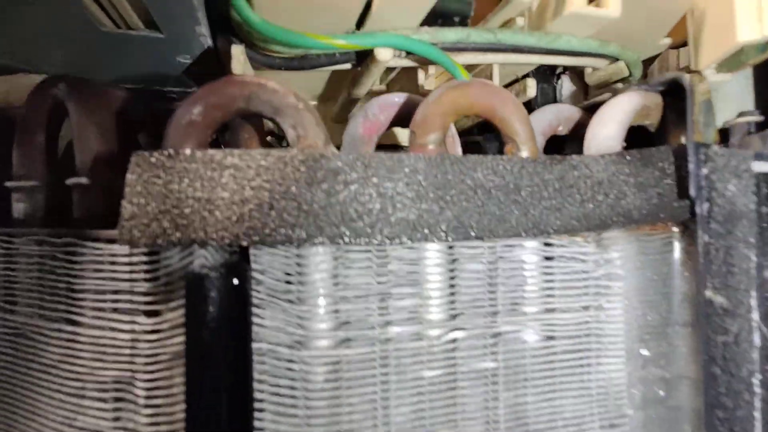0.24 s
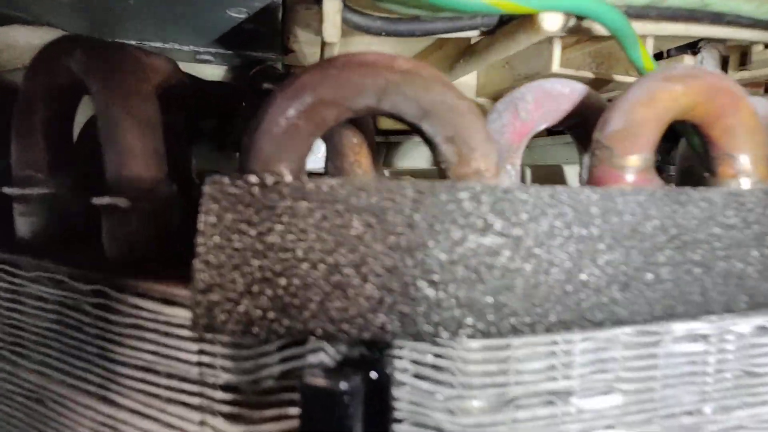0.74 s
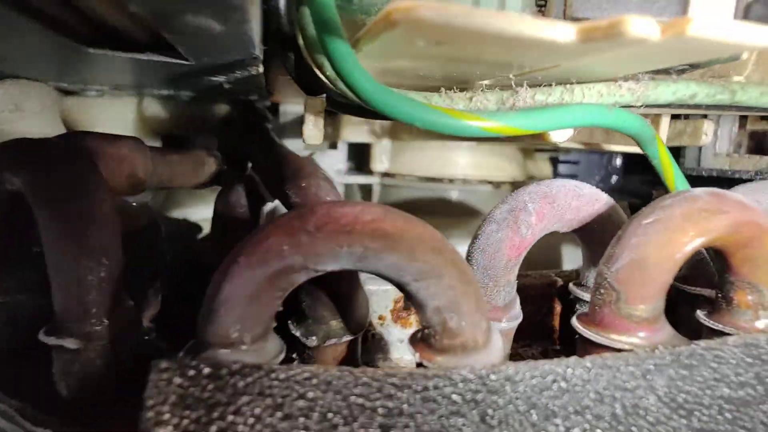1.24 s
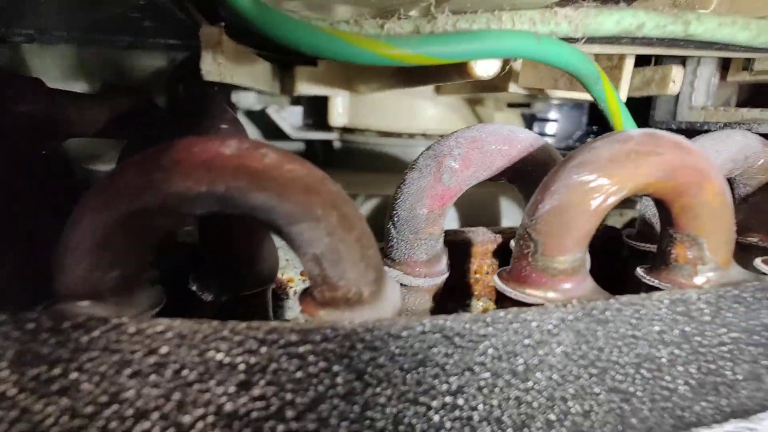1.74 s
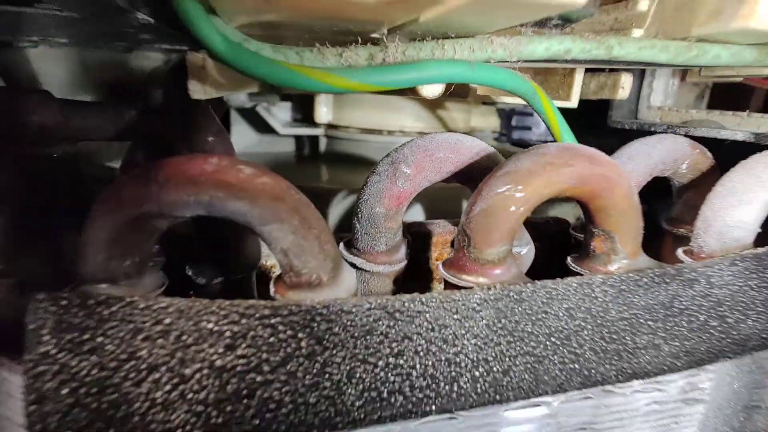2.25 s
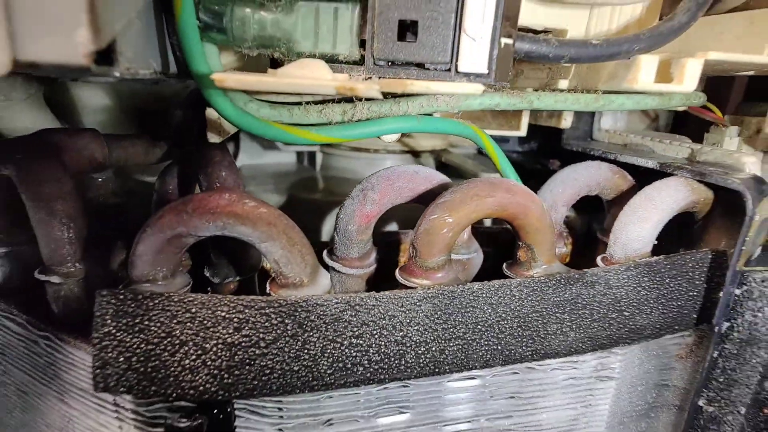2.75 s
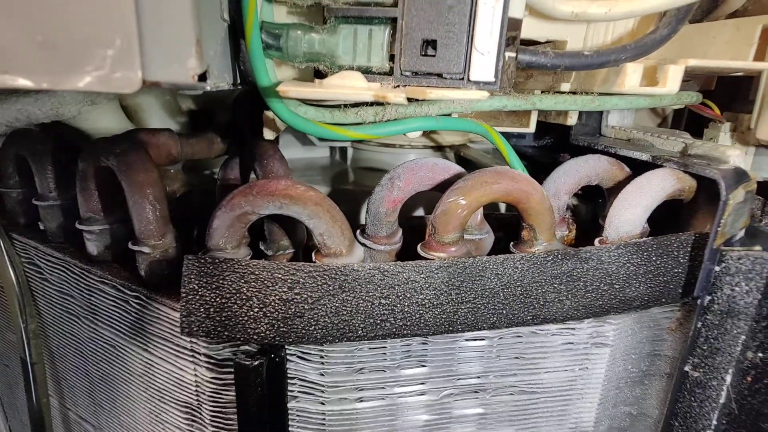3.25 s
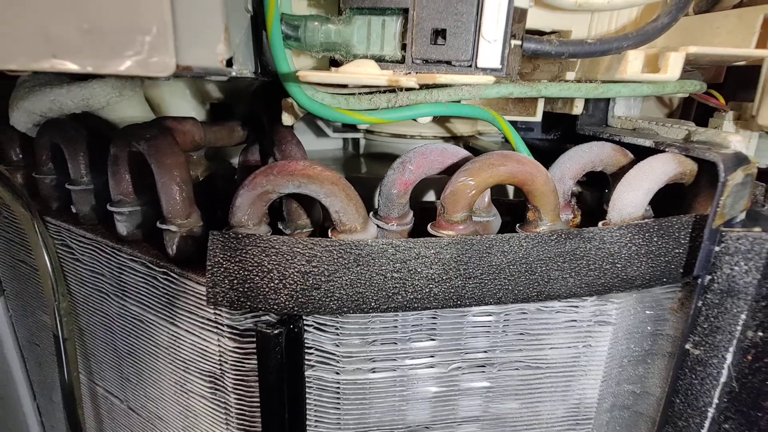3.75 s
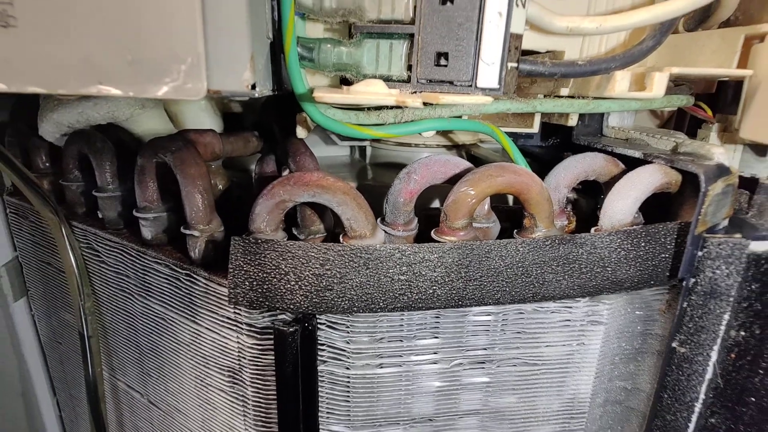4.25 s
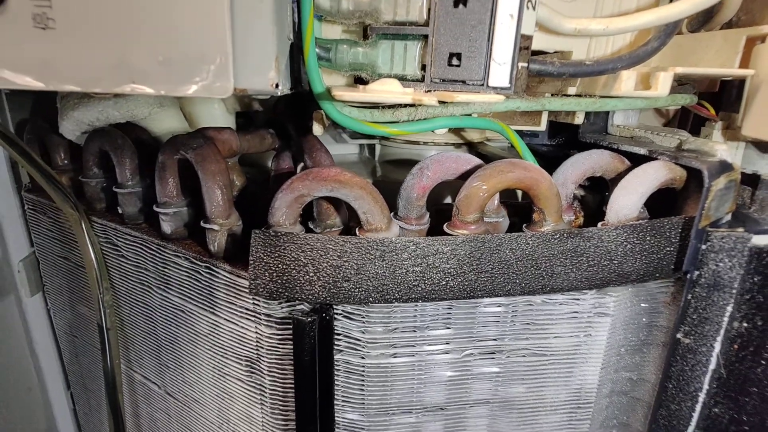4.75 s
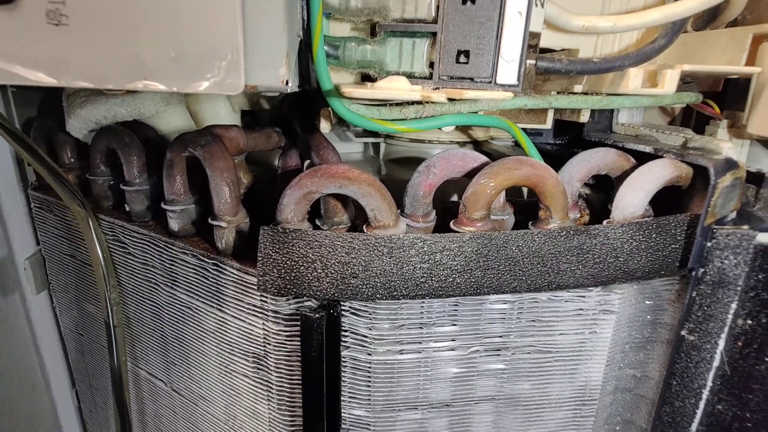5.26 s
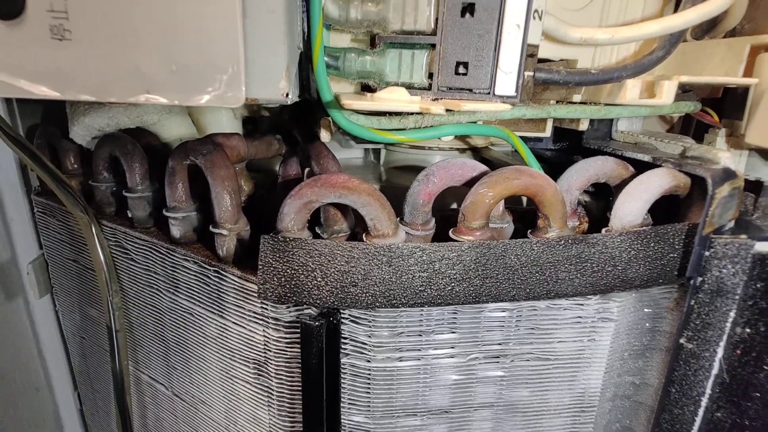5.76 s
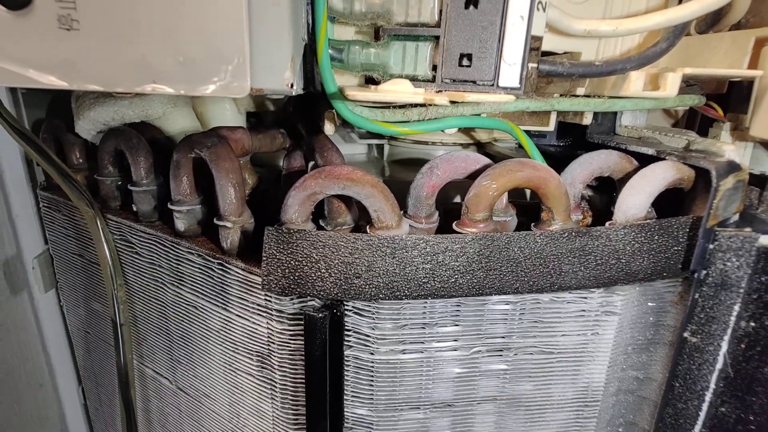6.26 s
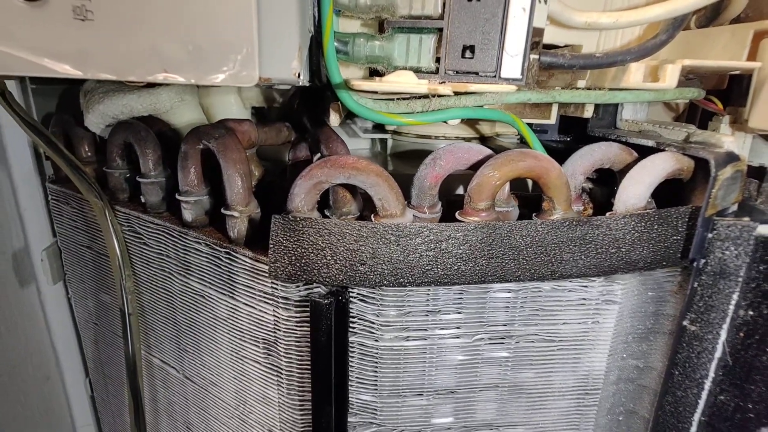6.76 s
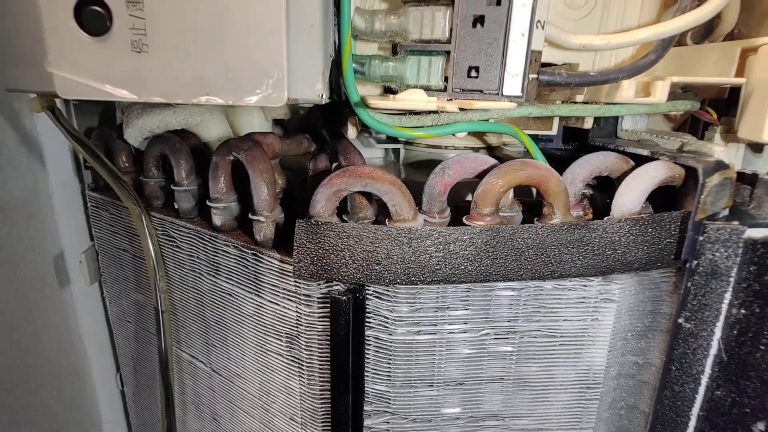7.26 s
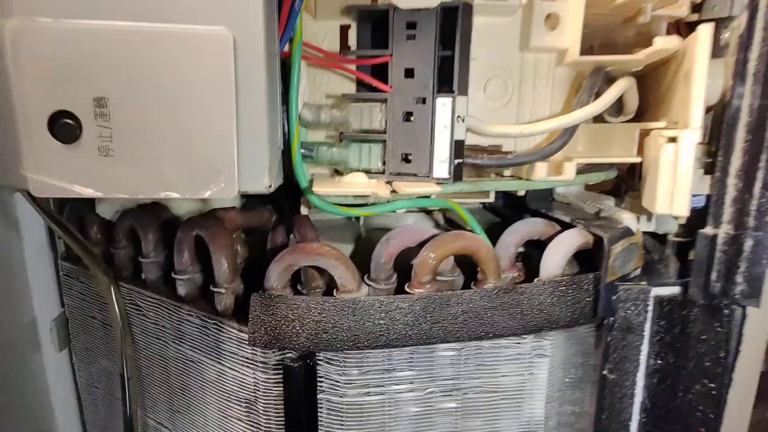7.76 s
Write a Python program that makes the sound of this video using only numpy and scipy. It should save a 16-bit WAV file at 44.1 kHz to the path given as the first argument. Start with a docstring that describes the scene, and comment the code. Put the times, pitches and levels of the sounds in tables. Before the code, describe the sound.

Close up, a cooling unit hums quietly while its coil snaps and ticks unevenly, with tiny liquid blips and one brief fizz midway.

```python
"""An opened indoor air conditioner hums in a quiet room, close to the microphone: steady sines and soft noise.
From the start its frosting coil contracts in sharp, irregular ticks: noise bursts that rattle through the fins,
ring in the casing and wake the room. The hand-held microphone rumbles early on, then leans in and the air swells.
Later come rising sine blips of refrigerant and, midway, one short two-band noise fizz with a fainter rumble.
One more strong tick and another faint rumble come near the end."""
import sys
import numpy as np
from scipy import signal
from scipy.fft import rfft, irfft
from scipy.io import wavfile
from scipy.ndimage import uniform_filter1d

SR = 44100
rng = np.random.default_rng(int(sys.argv[2]) if len(sys.argv) > 2 else 0)


def pcm_store(signal):
    """Save signal as 16-bit PCM."""
    levels = np.round(np.clip(np.atleast_2d(signal), -1, 1) * 32767)
    wavfile.write(sys.argv[1], SR, levels.astype(np.int16).T)


N = 354034
T = np.arange(N) / SR  # time in seconds

# slips of the coil: start_s, level_db (at 3-9 kHz, before room and standing waves),
# ring_db (extra casing ring around 2 kHz), bright_db (extra treble, in full from 12 kHz)
COIL_SLIPS = [(0.095, -40.5, 0.5, -3.5), (0.4022, -29, -1.2, -2), (0.6641, -22.8, -8.5, -2.5),
              (1.003, -27, -1.2, -2), (1.314, -41, -2.5, 0), (1.4209, -39.5, -8.5, 1.5),
              (2.9111, -25.5, -6, 2), (3.3325, -60, 4.5, -16), (3.6511, -23, -12.5, 2.5),
              (3.7718, -40.5, -3, 0), (4.3564, -40.3, -9.5, -8), (4.6236, -59.7, -8, -1),
              (4.652, -59.5, -6, -4), (4.7722, -53.5, -2.5, 0), (4.9172, -50, -12, 2),
              (4.938, -49, -11, -2), (5.6728, -45.5, -8, 3), (5.7418, -42.5, -14, 2.5),
              (5.875, -59.5, -18, 3), (6.0465, -53.6, -1.5, 2), (6.0606, -51, -3.5, 2),
              (6.7828, -43.5, -6.5, -4), (7.4451, -27.5, -0.5, -1), (7.7524, -55.8, -7, -1.6)]


def ticks(mix):
    """Adds every slip; each happens elsewhere on the coil and meets its own peaks and dips."""
    for start_s, level_db, ring_db, bright_db in COIL_SLIPS:
        place = standing_waves(depth_db=2.0, spacing_hz=189.7, full_hz=1500)
        add(mix, start_s, in_unit(tick(level_db, ring_db, bright_db), place))


TICK_PAN_DB = 1.5  # left minus right: the coil sits a little to the left
# stronger and brighter slips are quicker, so they carry less low knock (dB, and dB lost per dB)
USUAL_TICK_DB, USUAL_KNOCK_DB = -41.5, 0.6
KNOCK_LOSS_BY_LEVEL, KNOCK_LOSS_BY_BRIGHTNESS = 0.16, 0.54


def tick(level_db, ring_db, bright_db, rise_s=0.0032, sharpness=1.96,
         rattle_db=-10.0, rattle_t60_s=0.074, wet_db=1.1, size=16384):
    """One slip of the coil: a swarm of reflections between the fins, a short rattle, then the room."""
    t = np.arange(size) / SR
    hz = abs(np.fft.fftfreq(size, 1 / SR))
    swarm = (t / rise_s * np.exp(1 - t / rise_s)) ** sharpness
    rattle = amp(rattle_db - 60 * (t - rise_s) / rattle_t60_s) * np.minimum(t / rise_s, 1) ** 2
    shape = np.hypot(swarm, rattle)
    shape /= np.sqrt(np.mean(shape[t < 0.015] ** 2))  # rms 1 over the first 15 ms
    crack = np.fft.fft(rng.standard_normal((2, size)) * shape)
    # the fins scatter the slip in time but pass every band alike
    band_level = np.sqrt(uniform_filter1d(abs(crack) ** 2, size=300, mode="wrap"))
    crack *= causal(np.linalg.norm(shape) / band_level)
    heard = crack + amp(wet_db) * np.fft.fft(room_tail(t))
    level_loss_db = KNOCK_LOSS_BY_LEVEL * (level_db - USUAL_TICK_DB)
    knock_db = USUAL_KNOCK_DB - level_loss_db - KNOCK_LOSS_BY_BRIGHTNESS * bright_db
    colour = causal(tick_colour(hz, knock_db, ring_db, bright_db))
    return amp(level_db) * panned(TICK_PAN_DB) * np.fft.ifft(heard * colour).real


# broad colour that coil and casing give a tick: pitch_hz, relative level_db
COIL_COLOUR = [(420.0, -30), (760.0, -18.5), (1300.0, -21), (1750.0, -13.5), (2200.0, 4.5), (2750.0, -12),
               (3800.0, -14.5), (4650.0, -7.5), (5300.0, -13.5), (6400.0, -8.5), (7800.0, -10.5),
               (10000.0, -17.5), (12000.0, -14.5), (15000.0, -16)]
# narrow resonances of tubes and casing, shared by every tick: pitch_hz, width_hz, peak_db
CASING_MODES = [(758, 57, 5), (1515, 69, 2), (1820, 120, 5), (2090, 300, 4.5), (2715, 85, 5),
                (3060, 250, 3.5), (3603, 80, 7.5), (4500, 72, 2), (4670, 110, 3), (5640, 90, 2),
                (5850, 110, 3), (6700, 100, 3.5), (7550, 240, 3.5), (8660, 130, 4), (11600, 280, 5.5),
                (13430, 290, 7.5)]


def tick_colour(hz, knock_db, ring_db, bright_db):
    """Gain of coil and casing, rms 1 at 3-9 kHz; the place of the slip sets its knock, ring and brightness."""
    modes_db = sum(peak_db / (1 + (2 * (hz - mode_hz) / width_hz) ** 2)
                   for mode_hz, width_hz, peak_db in CASING_MODES)
    own_points = [(1400, knock_db), (1900, ring_db), (2400, ring_db), (2800, 0), (7500, 0), (12000, bright_db)]
    colour = amp(read(COIL_COLOUR, hz) + modes_db + read(own_points, hz))
    return colour / np.sqrt(np.mean(colour ** 2 * (hz > 3000) * (hz < 9000)))


# the room's answer to a tick, before build-up and mix: pitch_hz, start_db (relative), t60_s
ROOM_ECHO = [(710, 3.5, 0.13), (2200, -5.5, 0.17), (2980, -3, 0.18), (5000, -6.5, 0.18), (8000, -10, 0.19),
             (14000, -8.5, 0.17)]


def room_tail(t, build_up_s=0.015, steepness=0.98):
    """Diffuse echoes that swell as the walls answer, then die away at a rate set for each band."""
    hz, at_s, grid = signal.stft(rng.standard_normal((2, len(t))), SR, nperseg=256)
    room = np.array(ROOM_ECHO)
    start_db = read(room[:, [0, 1]], hz)[:, None]
    t60_s = read(room[:, [0, 2]], hz)[:, None]
    decay = np.exp(-np.log(1000) * at_s / t60_s)
    tail = signal.istft(grid * amp(start_db) * decay, SR, nperseg=256)[1]
    return tail[:, :len(t)] * np.minimum(t / build_up_s, 1) ** steepness


# bubbles in the tubes: start_s, peak_db (before standing waves), pitch_hz (at onset)
BUBBLES = [(2.6045, -40, 2780), (4.2295, -39, 2370), (4.9627, -33.5, 2850), (5.689, -33, 2740),
           (5.9918, -46.5, 2980)]


def blips(mix):
    """Adds every bubble of refrigerant at its time."""
    for start_s, peak_db, pitch_hz in BUBBLES:
        add(mix, start_s, blip(peak_db, pitch_hz))


def blip(peak_db, pitch_hz, glide=1.3, swell_s=0.0012):
    """A bubble rings briefly and rises a little in pitch; each port hears its own phase."""
    t = np.arange(0, 0.04, 1 / SR)
    turns = pitch_hz * t * (1 + glide * t) + rng.random((2, 1))
    swell = t / swell_s * np.exp(1 - t / swell_s)
    return amp(peak_db) * swell * np.sin(2 * np.pi * turns)


# the fizz's lower and upper hiss colours: pitch_hz, relative level_db
LOWER_HISS = [(1500, -28), (3000, -7), (3800, -18), (4800, -22), (5400, -17), (6500, 0), (9800, 1.5),
              (11500, -5), (15000, -19)]
UPPER_HISS = [(6000, -39), (10500, -30), (12000, 3), (12900, -1.5), (14300, 9), (16000, -5)]
# gas squirts through and the upper band flares: start_s, peak_db (over the flow), t60_s
GAS_SQUIRTS = [(4.986, 6.5, 0.26), (5.081, 8.5, 0.22)]
UPPER_HISS_DB = -12  # the upper hiss band against the lower one, between squirts


def fizz(grain_db=1.1, grains_per_s=400, lump_db=0.8, lumps_per_s=110, pan_db=-3.4):
    """Refrigerant sputters through a narrow tube in two lumpy hiss bands; squirts lift the upper one."""
    flow = spurt_flow()
    upper_flow = flow * np.hypot(amp(UPPER_HISS_DB), surges(GAS_SQUIRTS, attack_s=0.007))
    hiss = np.zeros((2, N))
    for level, colour in [(flow, LOWER_HISS), (upper_flow, UPPER_HISS)]:
        lumps = amp(lump_db * wander(lumps_per_s))
        hiss += level * lumps * evened(noise(colour))
    return panned(pan_db) * hiss * amp(grain_db * wander(grains_per_s))


def spurt_flow(start_s=4.935, level_db=-36.5, attack_s=0.034, hold_s=0.12, release_s=0.072, sag_db_per_s=72):
    """One spurt of refrigerant: its flow builds up, sags while it lasts and shuts off."""
    held_s = T - start_s - attack_s
    attack = np.clip((T - start_s) / attack_s, 0, 1)
    sag = amp(level_db - sag_db_per_s * np.maximum(held_s, 0))
    shut = np.exp(-np.log(100) * np.maximum(held_s - hold_s, 0) / release_s)  # 40 dB per release_s
    return attack * sag * shut


# tones of mains, compressor and fan: pitch_hz, level_db (rms, before wavering), pan_db (left minus right)
MACHINE_TONES = [(48, -67.5, 5), (59.8, -67, -7), (66.5, -51.5, 0), (117.5, -56.5, 0.2), (119.9, -61, 4.5),
                 (132.2, -65.5, 3.5), (176.5, -63, 2), (207, -62.5, 4), (239.1, -62.5, 7),
                 (298.7, -62.5, 4)]


def hum(waver_db=1.17, drift_turns=0.035, wavers_per_s=2.52):
    """Steady machine tones, each wavering slightly in level and phase."""
    out = np.zeros((2, N))
    for pitch_hz, level_db, pan_db in MACHINE_TONES:
        turns = pitch_hz * T + drift_turns * wander(wavers_per_s) + rng.random()
        level = np.sqrt(2) * amp(level_db + waver_db * wander(wavers_per_s))
        out += panned(pan_db) * level * np.sin(2 * np.pi * turns)
    return out


# soft rush of air, before lean, flutter and standing waves: pitch_hz, relative level_db (per Hz)
AIR_COLOUR = [(580, -89.5), (760, -84.5), (1050, -93.5), (1600, -98), (2200, -90.5), (2500, -94.5),
              (4000, -102.2), (4550, -101.4), (5200, -102.9), (6900, -105.1), (8000, -104.1),
              (9500, -113.2), (12000, -109.3), (15200, -112.9)]


def air(level_db=-0.9, lean_s=2.1, lean_width_s=0.69, lean_db=1.8, flutter_db=1.0, flutters_per_s=25):
    """Air drifts through fins and hollow casing, louder as the microphone leans in to the coil once."""
    near_db = lean_db * np.exp(-((T - lean_s) / lean_width_s) ** 2)
    return noise(AIR_COLOUR, low_hz=536) * amp(level_db + near_db + flutter_db * wander(flutters_per_s))


# low drone of the machine, before the band edges: pitch_hz, level_db (per Hz)
DRONE_COLOUR = [(20, -88), (40, -91), (70, -73), (90, -83.5), (130, -73), (230, -75.5), (270, -85.5),
                (330, -76), (380, -87.0), (470, -83.5), (600, -95)]


def drone(apart_hz=620, lag_s=0.00027):
    """Long waves reach both ports alike, the left a little later; shorter ones differ."""
    hz = np.fft.rfftfreq(N, 1 / SR)
    right, other = rfft(noise(DRONE_COLOUR, low_hz=33, high_hz=554))
    same = np.exp(-(hz / apart_hz) ** 2)
    delayed = right * np.exp(-2j * np.pi * hz * lag_s)
    left = same * delayed + np.sqrt(1 - same ** 2) * other
    return irfft(np.array([left, right]), N)


# dull colour of the handling rumble: pitch_hz, relative level_db
RUMBLE_COLOUR = [(15, -18), (40, -4), (65, -4), (140, -7), (220, -27), (600, -35.5), (2000, -74)]
# the hand shifts its grip on the microphone: start_s, peak_db, t60_s
GRIP_SHIFTS = [(0.38, -42.5, 1.55), (5.0, -53, 1.2), (7.66, -54, 2.6)]


def handling(apart=0.73):
    """A dull rumble through the body of the microphone, partly different at the two ports."""
    common, difference = noise(RUMBLE_COLOUR, low_hz=40)
    ports = np.array([common + apart * difference, common - apart * difference])
    return evened(ports) * surges(GRIP_SHIFTS, attack_s=0.072)


def standing_waves(depth_db=1.84, spacing_hz=70, full_hz=5000):
    """Fine peaks and dips of the hollow unit, deepening up to full_hz: one (Hz, dB) curve per port."""
    hz = np.arange(0, SR / 2 + 1, spacing_hz)
    pattern = rng.standard_normal((2, len(hz)))
    return [np.column_stack([hz, depth_db * np.minimum(hz / full_hz, 1) * port]) for port in pattern]


def in_unit(x, waves):
    """Passes a stereo sound through the standing waves."""
    hz = abs(np.fft.fftfreq(4096, 1 / SR))
    gain = amp([read(port, hz) for port in waves])
    response = np.fft.ifft(causal(gain)).real
    return signal.oaconvolve(x, response, axes=1)[:, :N]


def causal(gain):
    """Gives a gain curve the phase of a body that rings only after it is struck (minimum phase)."""
    return np.exp(np.conj(signal.hilbert(np.log(gain + 1e-9))))


def surges(rows, attack_s):
    """Gain over time for (start_s, peak_db, t60_s) rows: each rises evenly, then dies away."""
    total = np.zeros(N)
    for start_s, peak_db, t60_s in rows:
        rise = np.clip((T - start_s) / attack_s, 0, 1)
        decay = np.exp(-np.log(1000) * np.maximum(T - start_s - attack_s, 0) / t60_s)
        total += rise * amp(peak_db) * decay
    return total


def noise(spectrum, low_hz=0, high_hz=SR):
    """Two unrelated noises with the given dB per Hz, falling away steeply outside the edges."""
    hz = np.fft.rfftfreq(N, 1 / SR) + 1e-3
    edges = np.sqrt((1 + (low_hz / hz) ** 12) * (1 + (hz / high_hz) ** 12))
    white = rfft(rng.standard_normal((2, N)))
    return irfft(white * amp(read(spectrum, hz)) / edges, N) * np.sqrt(SR / 2)


def wander(per_s):
    """A random curve of rms 1 that takes a new value per_s times a second."""
    at_s = np.arange(0, T[-1] + 1, 1 / per_s)
    return evened(np.interp(T, at_s, rng.standard_normal(len(at_s))))


def amp(db):
    """Decibels to gain."""
    return 10 ** (np.asarray(db) / 20)


def evened(x):
    """Scales to rms 1."""
    return x / np.sqrt(np.mean(x ** 2) + 1e-20)


def read(points, hz):
    """Joins (Hz, value) points by straight lines on a log-frequency axis."""
    point_hz, value = np.transpose(points)
    return np.interp(np.log(hz + 1), np.log(point_hz + 1), value)


def panned(db):
    """Left and right gains for a level difference, left minus right."""
    return evened(amp([[db / 2], [-db / 2]]))


def add(mix, start_s, sound):
    """Mixes a stereo sound in at its start time."""
    part = mix[:, round(start_s * SR):][:, :sound.shape[1]]
    part += sound[:, :part.shape[1]]


def scene():
    """Ticks, blips and hiss inside the unit, over the steady machine and the handling rumble."""
    waves = standing_waves()
    inside = air() + fizz()
    ticks(inside)
    blips(inside)
    return in_unit(inside, waves) + hum() + drone() + handling()


def record(dry):
    """The recorder's band limit: a linear-phase low-pass at 15.75 kHz."""
    low_pass = signal.firwin(255, 15750, window=("kaiser", 9), fs=SR)
    return signal.oaconvolve(dry, low_pass[None], "same")


dry = scene()
out = record(dry)
pcm_store(out)
```